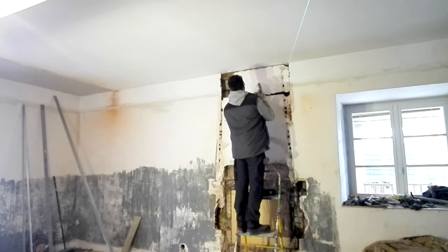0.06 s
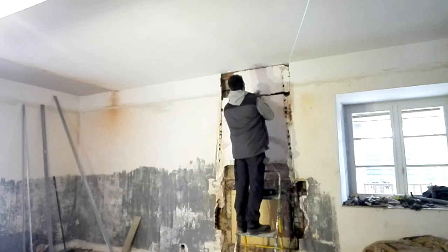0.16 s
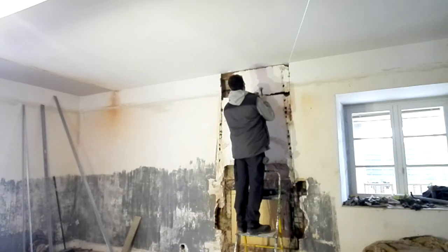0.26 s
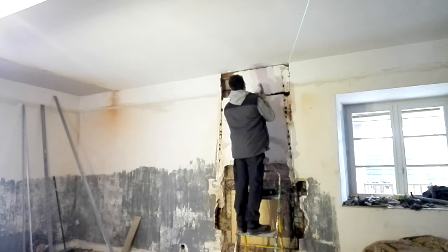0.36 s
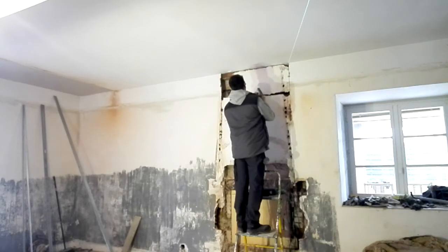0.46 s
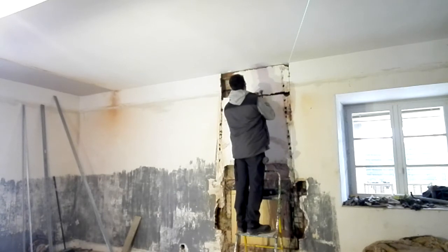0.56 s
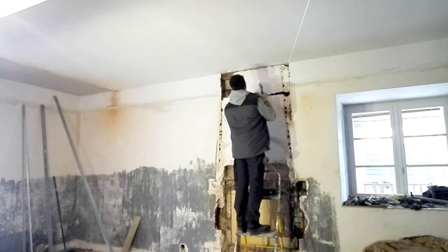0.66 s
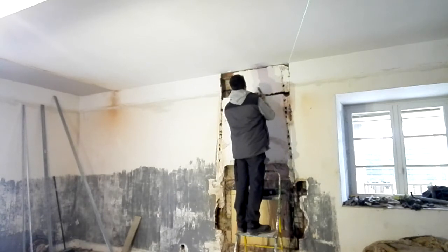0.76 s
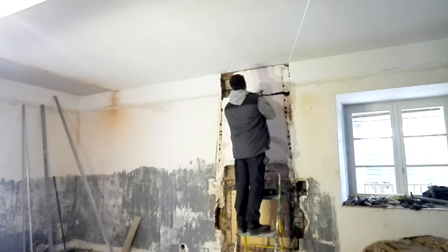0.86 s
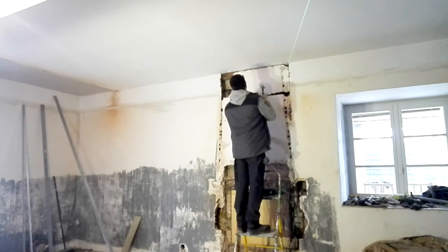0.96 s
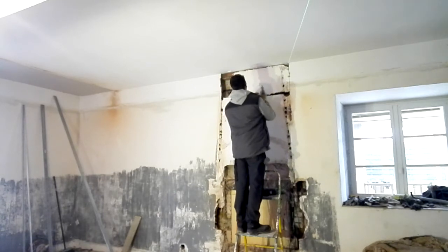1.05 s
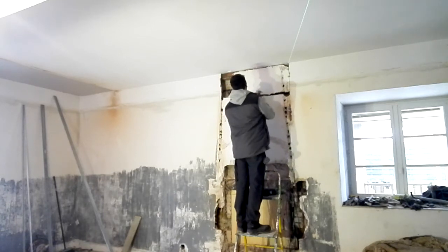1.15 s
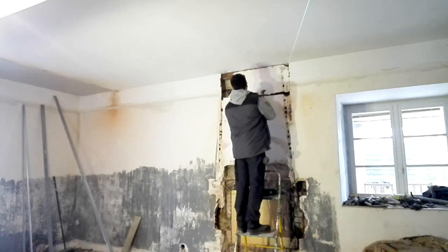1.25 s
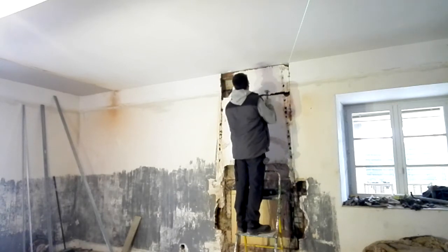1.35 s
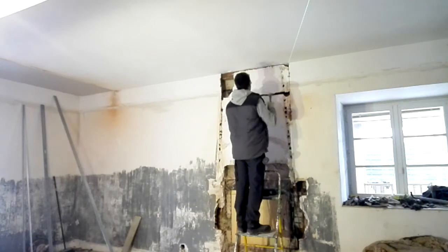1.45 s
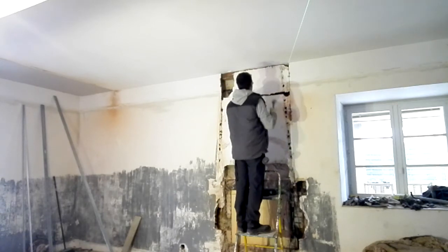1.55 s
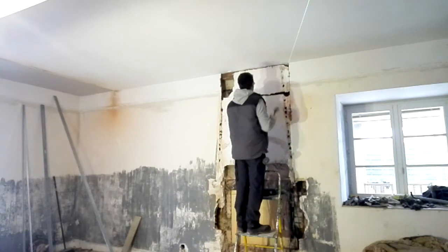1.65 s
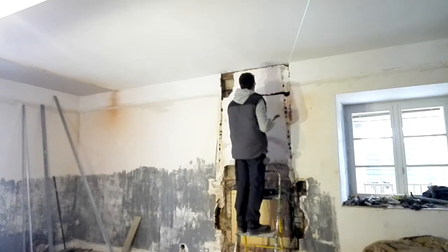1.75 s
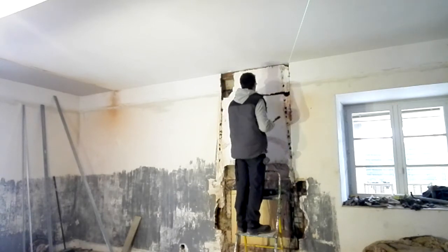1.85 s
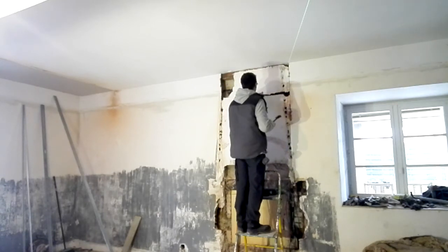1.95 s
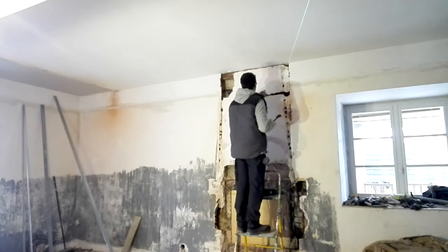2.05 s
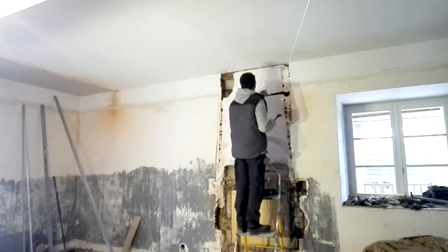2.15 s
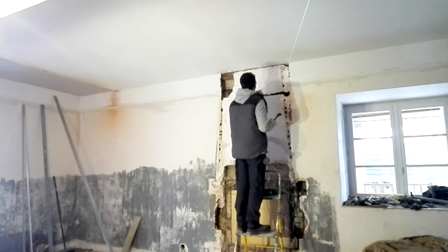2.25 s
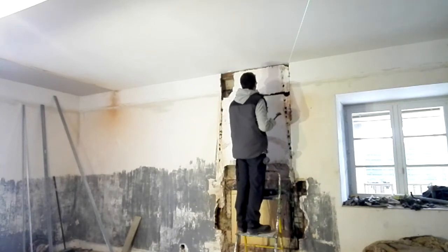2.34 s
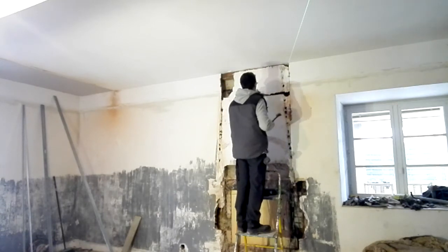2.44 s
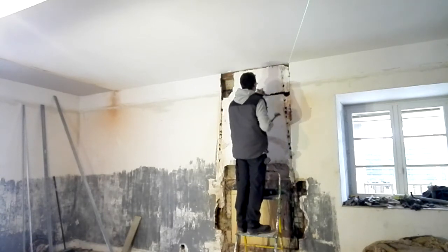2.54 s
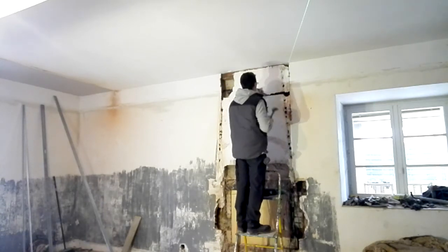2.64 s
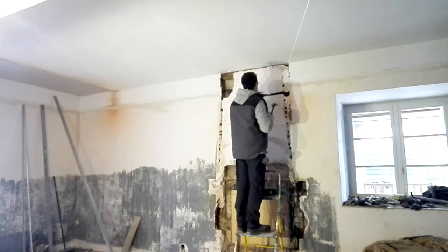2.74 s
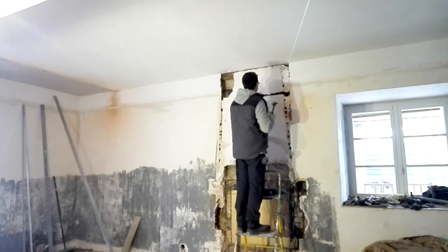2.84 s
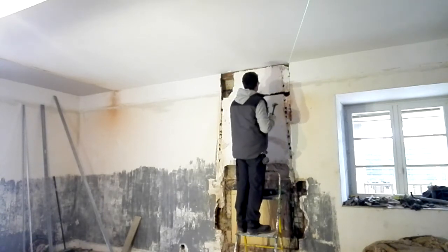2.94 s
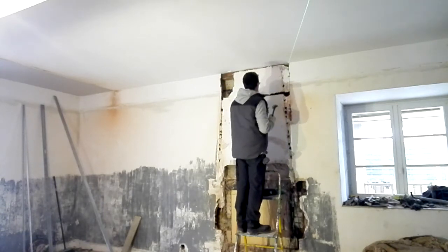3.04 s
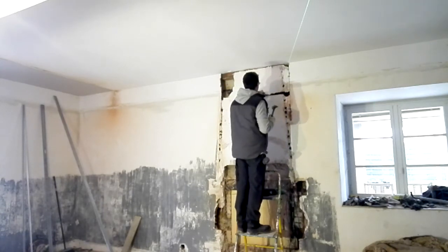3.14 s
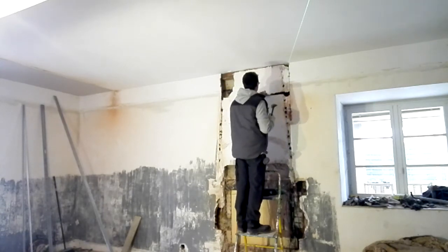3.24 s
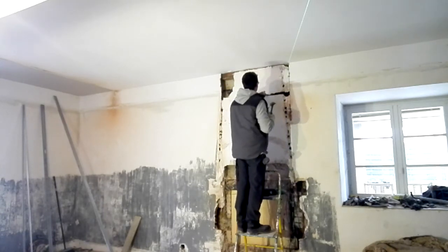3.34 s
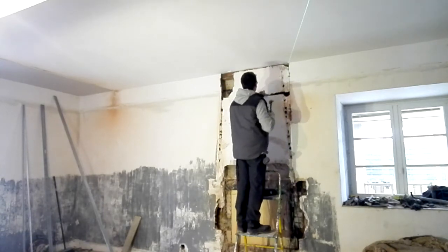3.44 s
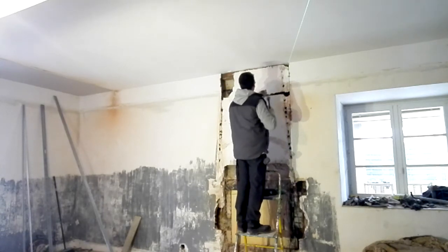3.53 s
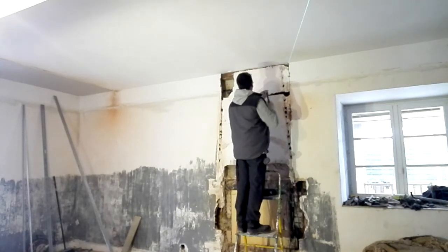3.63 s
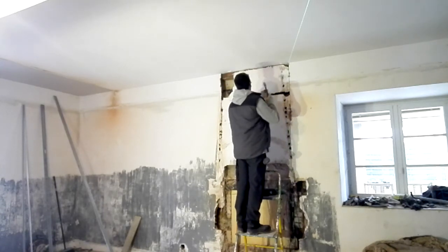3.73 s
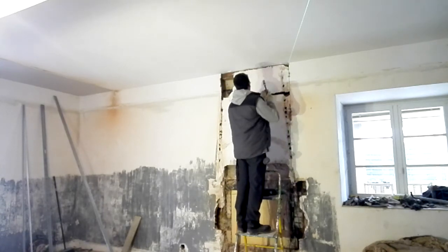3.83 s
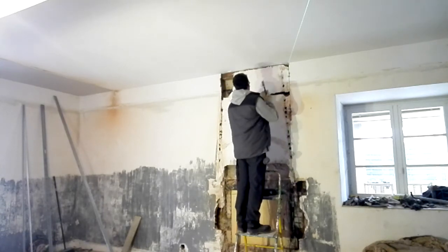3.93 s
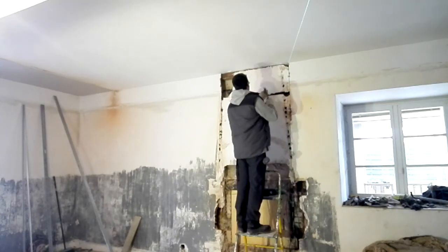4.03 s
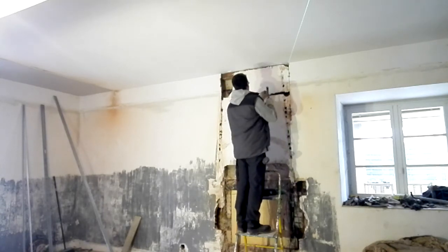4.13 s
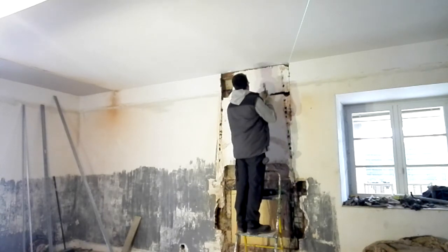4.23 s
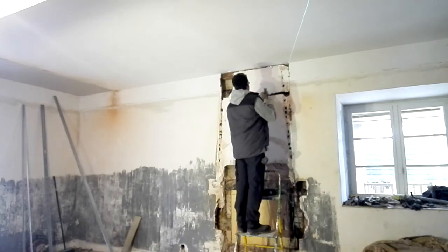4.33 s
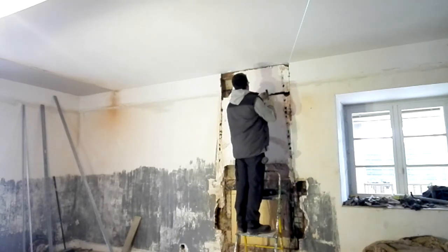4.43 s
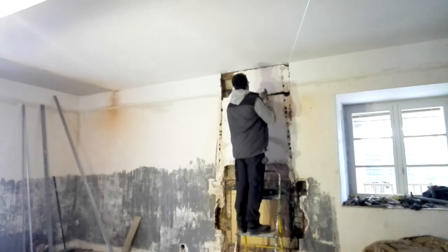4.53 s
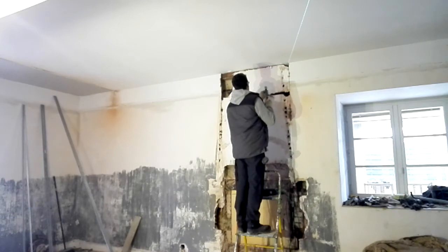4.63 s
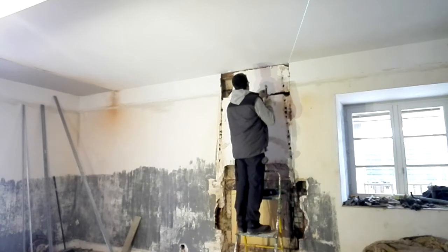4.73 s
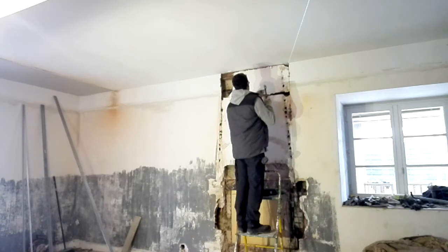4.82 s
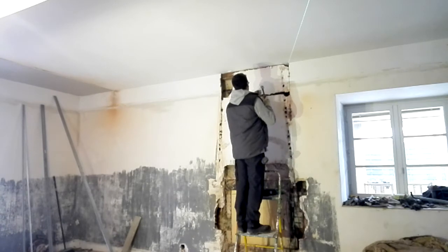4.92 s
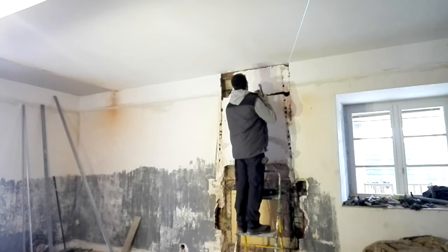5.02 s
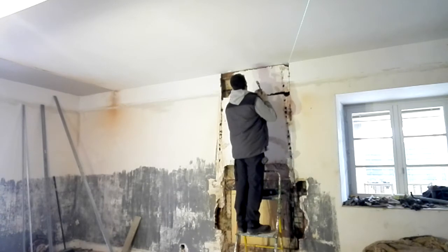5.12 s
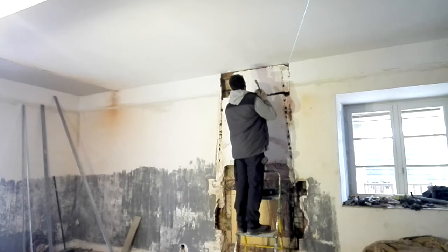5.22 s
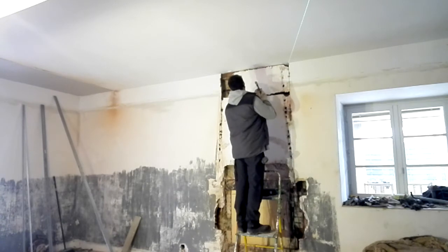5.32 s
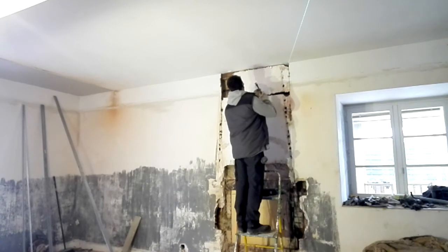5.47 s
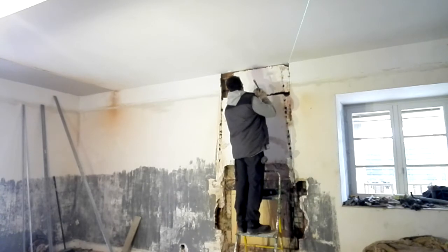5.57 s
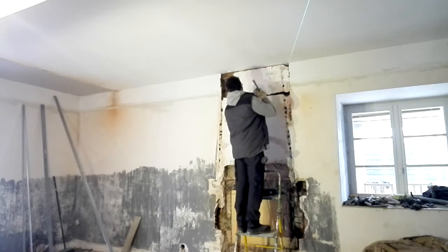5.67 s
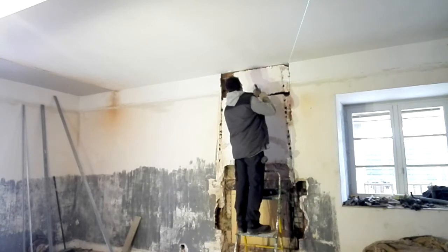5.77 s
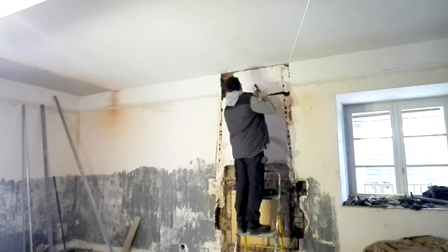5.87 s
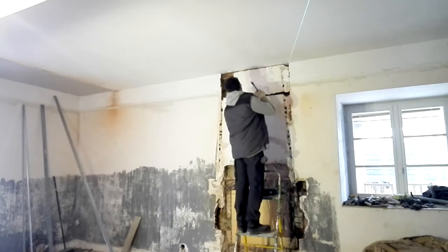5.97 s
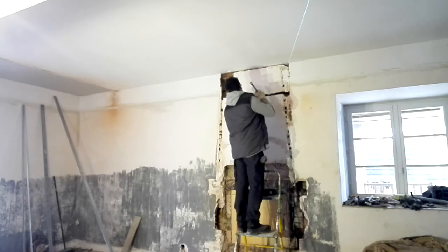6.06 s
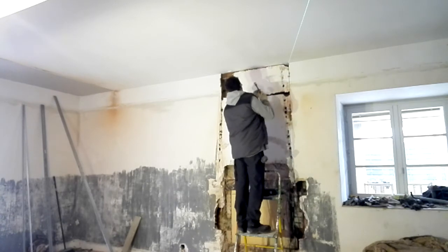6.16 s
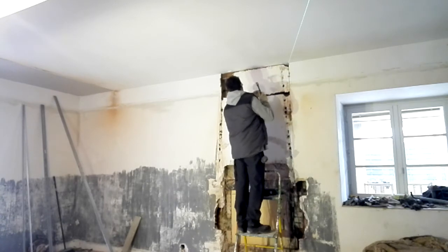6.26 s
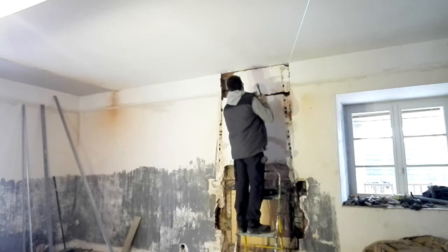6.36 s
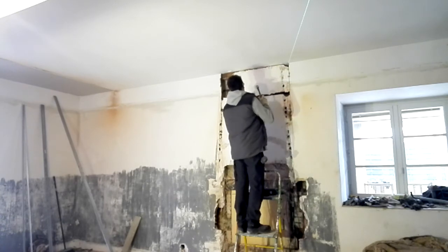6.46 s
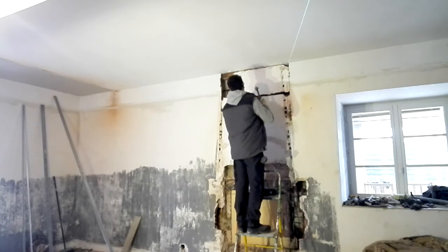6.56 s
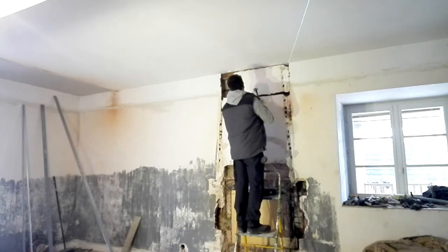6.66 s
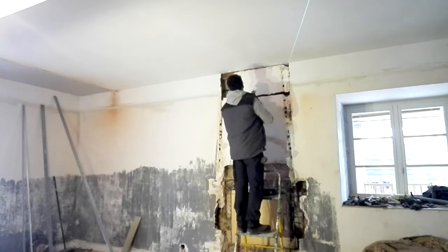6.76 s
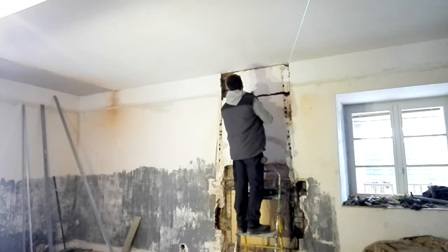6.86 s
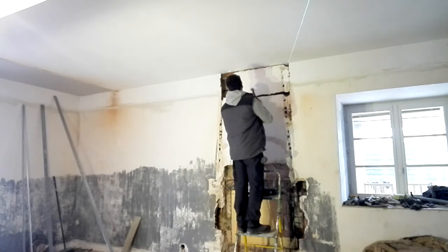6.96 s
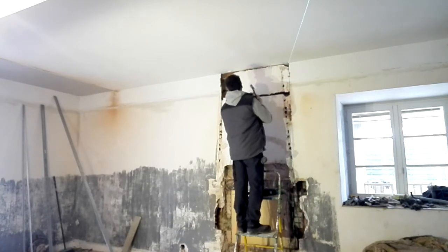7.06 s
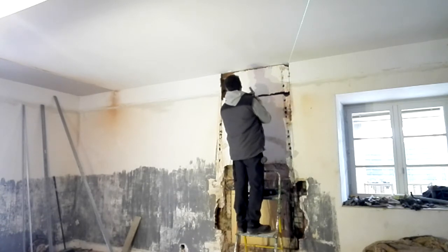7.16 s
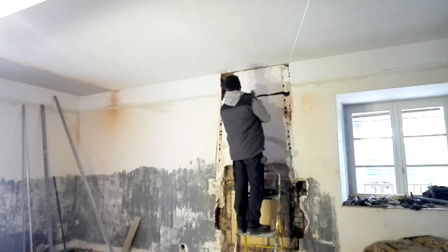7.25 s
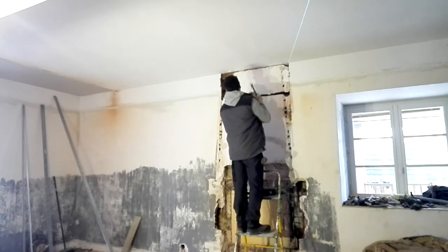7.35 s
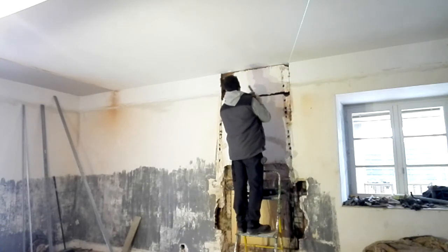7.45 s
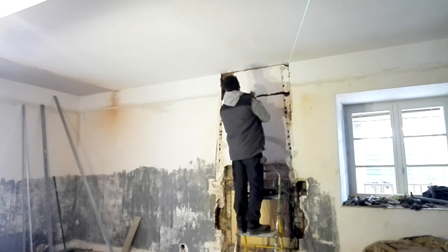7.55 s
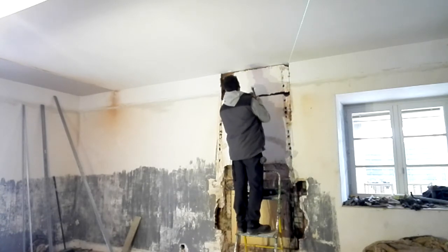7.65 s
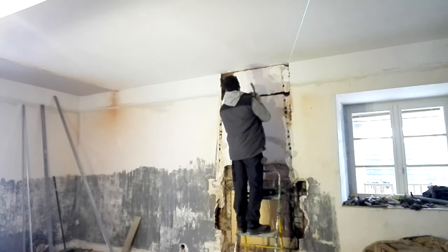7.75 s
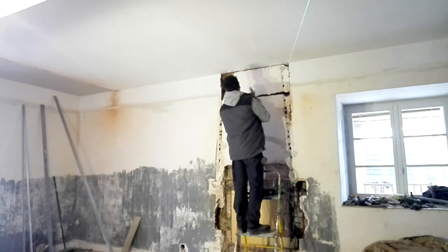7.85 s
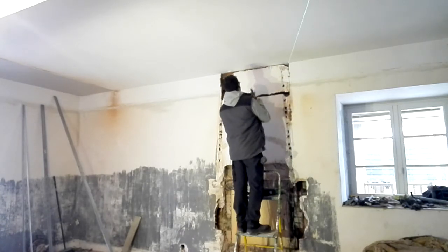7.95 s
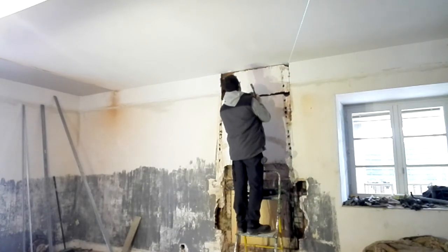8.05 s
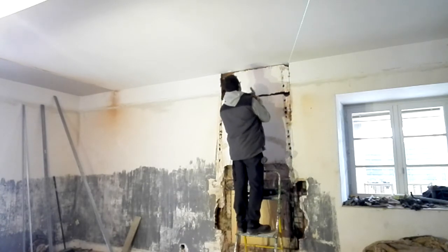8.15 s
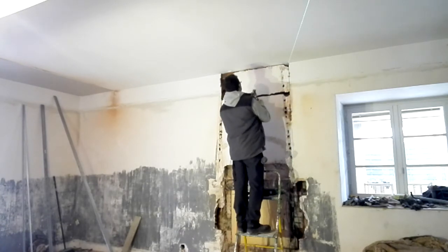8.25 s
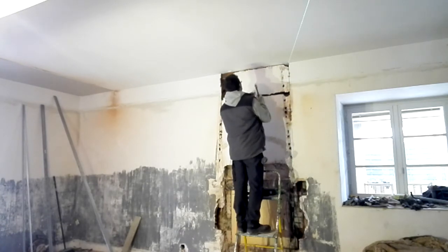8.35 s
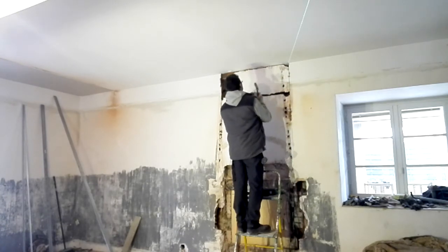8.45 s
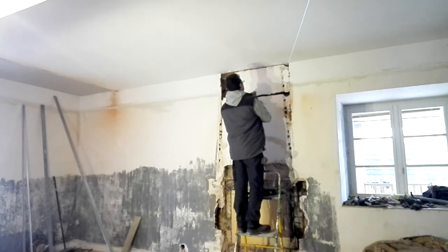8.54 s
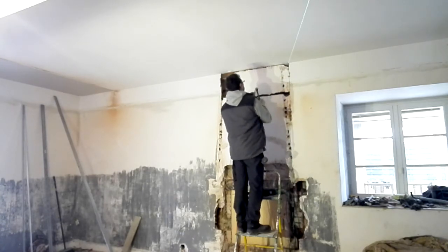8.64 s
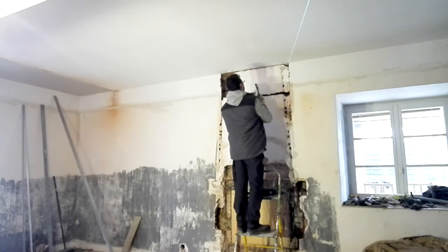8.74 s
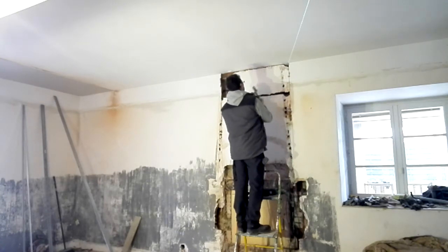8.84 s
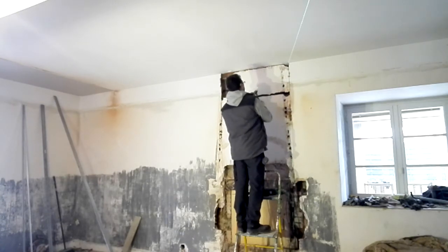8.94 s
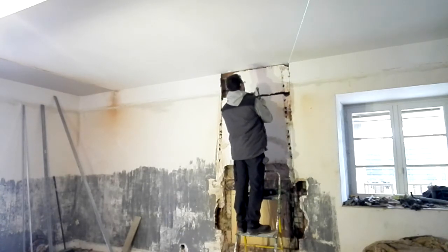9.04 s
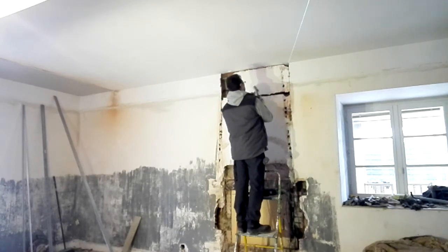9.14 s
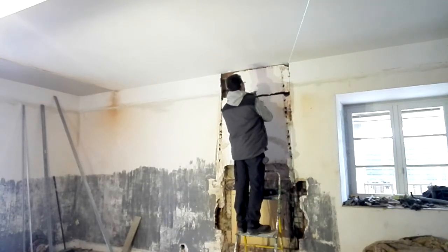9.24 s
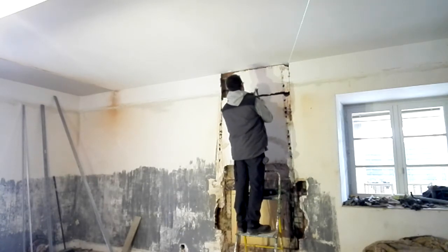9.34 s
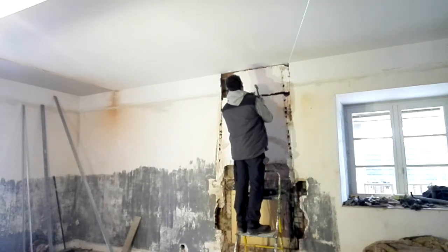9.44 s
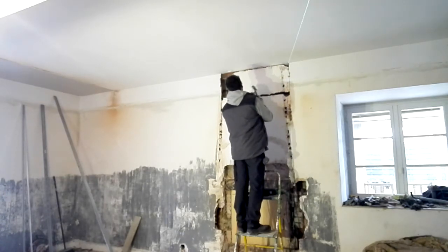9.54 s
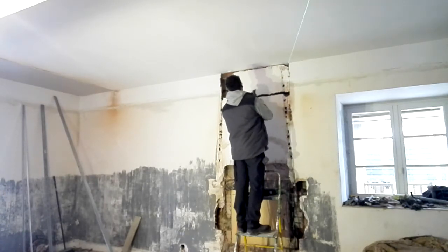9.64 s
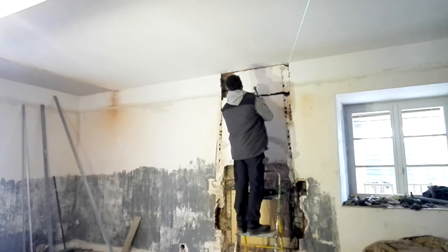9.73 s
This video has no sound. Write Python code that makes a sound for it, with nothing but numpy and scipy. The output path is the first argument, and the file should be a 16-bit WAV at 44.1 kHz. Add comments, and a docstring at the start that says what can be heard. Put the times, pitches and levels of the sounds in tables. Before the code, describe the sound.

Sharp hammer blows on a chisel thud and crack through masonry in an empty reverberant room, with quiet pauses of light steel clinks and gritty shuffling.

```python
"""A hammer drives a steel chisel into wall cladding in a bare, echoing room: each blow thuds through the
wall, cracks the mortar and rings the steel, as filtered noise bursts and damped resonances.
Between the runs the chisel grazes the wall (faint steel rings, each with one mode favoured), chips
land (clicks and crumbs) and feet and tool scuff over grit (random slips). Faint steady air noise
lies beneath."""
import sys
import numpy as np
from scipy import signal
from scipy.fft import rfft, irfft
from scipy.io import wavfile

SR = 44100
rng = np.random.default_rng(int(sys.argv[2]) if len(sys.argv) > 2 else 0)


def store_pcm(level_fs):
    """Save levels as 16-bit WAV."""
    pcm = np.round(np.clip(level_fs, -1, 1) * 32767).astype(np.int16)
    wavfile.write(sys.argv[1], SR, np.atleast_2d(pcm).T)


N = 431738
SIZE = 49152  # samples in one sound
T, F = np.arange(SIZE) / SR, np.arange(SIZE // 2 + 1) * SR / SIZE  # [s], [Hz]

# hammer blows: (time [s], force [dB], bite [0 loose tip - 1 wedged], off-centre [0-1],
# contact hardness [dB], thud of that spot [dB])
BLOWS = [(0.1895, 0.5, 1, 0.11, -4.5, -4.5), (0.5086, 1, 0.97, 0.14, -15, -4.5),
         (0.8284, -0.5, 1, 0.15, -24, -4.5), (1.1537, -1, 1, 0.05, -22, -2), (4.0521, 0, 0.5, 1, -3, -5.5),
         (4.3546, 0, 0, 0.23, -2, -3.5), (5.7888, -2, 0.51, 1, -7, -2.5),
         (7.2372, -2.5, 0.41, 0.4, 0.5, 7.5), (7.5497, 0.5, 0.8, 1, 9.5, 1.5),
         (7.881, 1.5, 0.88, 0, -3, -2.5), (8.2121, 0, 0.83, 0, -4, -1), (8.5595, 2, 0.68, 0.3, -0.5, -0.5),
         (8.904, -2, 0.89, 0.4, 2.5, -1), (9.24, 2.5, 0.49, 0.48, -0.5, -2), (9.6151, 2, 0.59, 0, -4.5, -7)]
STROKE_S = 0.33  # time from the stroke before the start to the first listed blow
# wall entry of a 0 dB blow: (level with a loose tip [dB], level with a wedged tip [dB])
BOOM_LEVELS_DB = (-40, -32)
THUD_LEVELS_DB = (-40, -22)
KNOCK_LEVELS_DB = (-43.5, -22)
CRACK_LEVELS_DB = (-27, -21)
BLOOM_LEVELS_DB = (-47, -22.5)
# deep boom of the building: (frequency [Hz], relative density [dB per Hz])
BOOM_COLOUR = [(20, -16.5), (36, -6), (45, -12), (54, 2.5), (66, -22), (82, -0.5), (120, -5), (170, -22)]
# thud of the wall: (frequency [Hz], relative density [dB per Hz])
THUD_COLOUR = [(80, -20), (135, 4.5), (180, 4.5), (230, 3), (290, 0), (345, -1.5), (410, -10), (900, -32.5)]
# knock of the cladding: (frequency [Hz], relative density [dB per Hz])
KNOCK_COLOUR = [(200, -28), (410, -10), (500, 1.5), (620, 0), (950, 3), (1300, 3), (1600, 1), (2100, -1.5),
                (3200, -15), (7000, -18.5)]
# crack of the mortar: (frequency [Hz], relative density [dB per Hz])
CRACK_COLOUR = [(300, -24), (1400, 1), (2500, 0.5), (5200, -1.5), (6300, 2.5), (7400, -5), (8400, -10.5),
                (11000, -9), (12500, -14), (14200, -19.5)]
# wall and room resonances that bloom after a blow: (frequency [Hz], relative level [dB], t60 [s])
WALL_MODES = [(33, -26, 2.4), (54, -21.5, .7), (160, -11, .4), (181, -7, .45), (214, -8, .5),
              (271, -6.5, .45), (323, -10.5, .45), (473, -19, .6), (508, -19, .55), (686, -18, .6),
              (807, -18, .55), (876, -17, .6), (1014, -15, .55), (1421, -20, .55)]
# share of the contact hardness by frequency: (frequency [Hz], share [0-1])
HARDNESS_SHARE = [(7500, 0), (11000, 1)]
# note of the cladding, until it cracks
TILE_HZ, TILE_DB, TILE_T60_S, TILE_CRACKS_S = 2126, -32, .1, .7

# chisel and hammer head: (nominal frequency [Hz], relative level [dB], t60 [s])
STEEL_MODES = [(2210, -4, .09), (3316, -15, .03), (4135, -11, .06), (4620, -15, .05), (5918, -2.5, .22),
               (5985, -5, .03), (6648, -5, .08), (6790, -4, .018), (7130, -4, .018), (7310, -2, .04),
               (7420, -8, .02), (8060, -18, .05), (9260, -20, .06), (10020, -8, .035), (11380, -8, .012),
               (11515, -6.5, .1), (11640, -3, .025), (13160, 1, .04)]
STEEL_RISE_S = .0025
# ring with a loose tip: (frequency [Hz], gain [dB])
RING_LOOSE_GAIN = [(2200, -28.5), (3300, -30.5), (4140, -20), (4620, -22.5), (5950, -24), (6700, -33.5),
                   (7400, -32.5), (10020, -16), (11550, -19), (13160, -26)]
# ring with a wedged tip: (frequency [Hz], gain [dB])
RING_WEDGED_GAIN = [(2200, -54), (4140, -48.5), (5950, -39.5), (6700, -39), (7400, -41.5), (10020, -33),
                    (11550, -29.5), (13160, -60)]
# bending modes favoured by a fully off-centre blow: (frequency [Hz], gain [dB])
AIM_GAIN = [(5990, 7.5), (6600, -18), (10020, -22), (11380, -18), (11515, -5), (11640, -16), (13160, -16)]
# bounce of the chisel on its seat; its pitch rises with bite squared
SEAT_HZ, SEAT_RISE_HZ, SEAT_WIDTH_HZ, SEAT_DB = 6650, 725, 360, 17.5

# grazes of the loose chisel: (time [s], level offset [dB], favoured mode [Hz])
CLINK_EVENTS = [(1.877, -53.5, 4620), (1.992, -52.5, 4620), (2.1, -62, 10020), (2.579, -73, 4135),
                (3.029, -62.5, 4135), (3.111, -51.5, 4135), (3.65, -64, 4135), (4.93, -60.5, 10020)]
# reach of a sideways graze into the steel: (frequency [Hz], gain [dB])
GRAZE_GAIN = [(2200, -11), (3300, -5), (4140, 11), (4620, 10.5), (5940, -2), (6650, 1.5), (7300, -9),
              (8060, 13), (9260, 10), (10020, -1.5), (11500, -12), (13160, -26)]
FAVOURED_DB, FAVOURED_WIDTH_HZ = 8.5, 200
# landing chips: (time [s], click level [dB], note [Hz], note level [dB])
CHIP_EVENTS = [(1.625, -55.5, 6300, -65.5), (3.152, -29, 2683, -51.5), (5.276, -47, 5100, -48),
               (6.291, -41, 3020, -46), (6.441, -28, 3380, -49.5)]
# click of a chip whose note is CHIP_HZ: (frequency [Hz], relative density [dB per Hz])
CHIP_COLOUR = [(200, -22), (500, -14), (1200, -1), (3200, 3), (6500, -10.5), (10000, -24.5), (14000, -31)]
CHIP_HZ, CHIP_NOTE_T60_S = 3070, .003
# shifting feet and tool scuffs: (time [s], bump level [dB], grit level [dB], length [s])
SCUFF_EVENTS = [(1.856, -50, -58.5, 0.02), (1.895, -38.5, -47.5, 0.025), (2.437, -62, -63.5, 0.08),
                (2.563, -52.5, -56.5, 0.028), (3.016, -54, -55.5, 0.052), (3.061, -43.5, -49.5, 0.049),
                (3.392, -44, -54.5, 0.027), (3.634, -50, -57.5, 0.076), (3.833, -64.5, -63.5, 0.032),
                (3.873, -53.5, -66.5, 0.062), (4.874, -57, -53.5, 0.014), (4.925, -54.5, -65.5, 0.025),
                (5.115, -77, -57.5, 0.06), (5.159, -44, -59, 0.029), (6.589, -56, -56, 0.028),
                (6.815, -60.5, -80.5, 0.025)]
# bump on the footing: (frequency [Hz], relative density [dB per Hz])
BUMP_COLOUR = [(25, 0.5), (80, 3), (150, 2), (220, 3), (300, -7.5), (430, -11.5), (600, -17), (900, -28),
               (2000, -34.5)]
# slipping grit: (frequency [Hz], relative density [dB per Hz])
GRIT_COLOUR = [(300, -10), (600, 2.5), (900, 7.5), (1400, 6), (4500, -1.5), (7500, -10), (10000, -18),
               (14000, -29)]
# air noise: (frequency [Hz], relative density [dB per Hz])
AIR_COLOUR = [(15, -38), (25, -1), (80, -12), (113, -6), (539, -32), (1400, -23.5), (2640, -32.5),
              (6330, -29), (9660, -33), (14000, -33.5)]
AIR_DB = -74.5
# strong early reflections from wall and ceiling: (delay [s], gain [linear])
EARLY_REFLECTIONS = [(.0002, .6), (.0012, 0.92), (.0045, .8), (.0058, .9), (0.0115, .45), (.021, 0.57)]
# reverberation: (frequency [Hz], t60 [s])
ROOM_DECAY = [(100, 0.61), (400, 0.61), (1500, 0.66), (4000, 0.6), (7000, 0.5), (10000, 0.38), (14000, 0.4)]
# treble tilt of the early reflections: (frequency [Hz], gain [linear])
EARLY_TILT = [(300, 0.17), (2000, 0.27), (7000, 1.0)]
TOP_HZ = 14150


def undb(db):
    """Decibels to gain."""
    return 10 ** (np.asarray(db) / 20)


def along(points, hz):
    """Read (Hz, value) points on a log-frequency axis."""
    at, value = np.transpose(points)
    return np.interp(np.log(hz + 1), np.log(at), value)


def causal(db):
    """Minimum-phase response with the given gain at each frequency."""
    cepstrum = irfft(np.log(undb(db) + 1e-5))
    cepstrum[1:SIZE // 2] *= 2
    cepstrum[SIZE // 2 + 1:] = 0
    return np.exp(rfft(cepstrum))


def colour(points):
    """Response with the given (Hz, dB) shape, falling 12 dB per octave outside its range."""
    octaves_outside = np.abs(np.log2((F + 1) / np.clip(F + 1, points[0][0], points[-1][0])))
    return causal(along(points, F) - 12 * octaves_outside)


def mode(hz, t60_s):
    """Response of one damped resonance."""
    width_hz = np.log(1000) / (np.pi * t60_s)
    return 1j * F * width_hz / (hz ** 2 - F ** 2 + 1j * F * width_hz)


def sound(spectrum, db, span_s=0.12):
    """Waveform of a spectrum at an rms level over its first span_s, faded over its second half."""
    wave = irfft(spectrum) * np.minimum(1, 2 * (1 - T / T[-1]))
    rms = np.sqrt(np.mean(wave[:int(span_s * SR)] ** 2))
    return wave * undb(db) / rms


def add(track, s, wave):
    """Mix a sound in at time s, which may lie before the start."""
    start = int(s * SR)
    wave, start = wave[max(-start, 0):], max(start, 0)
    track[start:start + len(wave)] += wave[:max(N - start, 0)]


def room_paths(count, early_db=8.0, contact_s=0.00094, build_s=0.0022, hold_s=0.0034):
    """Room responses to a gritty contact, a new one per event: early noise bursts and a diffuse tail."""
    hz, t60_s = np.transpose(ROOM_DECAY)
    # overlapping bands, one per decay time
    bands = np.array([along(np.column_stack([hz, own]), F) for own in np.eye(len(hz))])
    # echoes thicken, hold for the first crossings, then die away
    decay = undb(-60 * (np.hypot(T, hold_s) - hold_s) / t60_s[:, None])
    fades = decay * (1 - np.exp(-T / build_s))
    bursts = sum(gain * (T >= s) * np.exp(-np.abs(T - s) / contact_s) for s, gain in EARLY_REFLECTIONS)
    tilt = along(EARLY_TILT, F)
    for _ in range(count):
        tail = (irfft(bands * rfft(rng.standard_normal(SIZE))) * fades).sum(axis=0)
        early = rfft(bursts * rng.standard_normal(SIZE)) * tilt
        yield rfft(tail) + undb(early_db) * early


def spot(patchy_db, count=70):
    """Broad, uneven resonances of one spot: random gains over frequency."""
    hz = np.linspace(np.sqrt(300), np.sqrt(15000), count) ** 2
    return causal(patchy_db * np.interp(F, hz, rng.standard_normal(count)))


def hammering(crack_hardness=0.18):
    """Each blow excites wall, cladding, mortar and steel; a wedged tip thuds, a loose one rings."""
    track = np.zeros(N)
    boom, thud = colour(BOOM_COLOUR), colour(THUD_COLOUR)
    knock, crack = colour(KNOCK_COLOUR), colour(CRACK_COLOUR)
    bloom = np.zeros(SIZE)
    for k, (hz, db, t60_s) in enumerate(WALL_MODES):
        # the shorter second resonance slows the onset; polarities alternate
        bloom += (-1) ** k * sound(mode(hz, t60_s) * mode(hz, t60_s / 8), db)
    loose_db, wedged_db = np.transpose(
        [BOOM_LEVELS_DB, THUD_LEVELS_DB, KNOCK_LEVELS_DB, CRACK_LEVELS_DB, BLOOM_LEVELS_DB])
    # the run is already under way: the room still rings from one stroke earlier
    blows = [(BLOWS[0][0] - STROKE_S, *BLOWS[0][1:]), *BLOWS]
    for blow, room, tool_room in zip(blows, room_paths(len(blows)), room_paths(len(blows))):
        s, force_db, bite, off_centre, hard_db, spot_db = blow
        boom_db, thud_db, knock_db, crack_db, bloom_db = loose_db + bite * (wedged_db - loose_db)
        masonry = sound(room * boom, boom_db) + sound(room * thud, thud_db + spot_db)
        masonry = masonry + bloom * undb(bloom_db + spot_db)
        hardness = undb(crack_hardness * hard_db * along(HARDNESS_SHARE, F))
        struck = room * spot(patchy_db=3.0) * hardness
        cladding = sound(struck * knock, knock_db) + sound(struck * crack, crack_db)
        if s < TILE_CRACKS_S:
            cladding = cladding + sound(room * mode(TILE_HZ, TILE_T60_S), TILE_DB)
        tool = steel(tool_room, ring_levels(bite, off_centre, hard_db))
        add(track, s, undb(force_db) * (masonry + cladding + tool))
    return track


def ring_levels(bite, off_centre, hard_db):
    """Gain in dB of each steel mode: the wall damps them, seat, aim and hardness pick among them."""
    hz = np.array(STEEL_MODES)[:, 0]
    damped_db = (1 - bite) * along(RING_LOOSE_GAIN, hz) + bite * along(RING_WEDGED_GAIN, hz)
    seat_hz = SEAT_HZ + SEAT_RISE_HZ * bite ** 2
    seat_db = SEAT_DB * np.exp(-((hz - seat_hz) / SEAT_WIDTH_HZ) ** 2)
    aim_db = off_centre * along(AIM_GAIN, hz)
    return damped_db + seat_db + aim_db + hard_db * along(HARDNESS_SHARE, hz)


def steel(room, strengths_db):
    """Steel modes swell briefly and ring into the room; the grip detunes them a little each time."""
    detunes = 1 + .0012 * rng.standard_normal(len(STEEL_MODES))
    gains = undb(np.array(STEEL_MODES)[:, 1] + strengths_db)
    spectrum = np.zeros(len(F), complex)
    for (hz, _, t60_s), detune, gain in zip(STEEL_MODES, detunes, gains):
        ring = room * mode(hz * detune, t60_s) * mode(hz, STEEL_RISE_S)
        energy = np.vdot(ring, ring).real
        spectrum += ring * (gain / np.sqrt(energy))
    return sound(spectrum, 20 * np.log10(np.linalg.norm(gains)))


def clinks():
    """Faint rings of the chisel moved to a new place; each graze favours one mode."""
    track, hz = np.zeros(N), np.array(STEEL_MODES)[:, 0]
    for (s, db, note_hz), room in zip(CLINK_EVENTS, room_paths(len(CLINK_EVENTS))):
        others_db = -FAVOURED_DB * (1 - np.exp(-((hz - note_hz) / FAVOURED_WIDTH_HZ) ** 2))
        add(track, s, steel(room, db + along(GRAZE_GAIN, hz) + others_db))
    return track


def chips(bounce=0.13, settle_s=0.027, bounces_per_s=90):
    """A chip lands with a click and a very short note, then crumbs bounce as sparse decaying impulses."""
    track = np.zeros(N)
    for (s, db, note_hz, note_db), room in zip(CHIP_EVENTS, room_paths(len(CHIP_EVENTS))):
        hits = (rng.random(SIZE) < bounces_per_s / SR) * rng.standard_normal(SIZE)
        force = bounce * hits * np.exp(-T / settle_s)
        force[0] = 1
        landing = room * rfft(force) * spot(patchy_db=0.3)
        # the colour shifts with the note
        shape = np.array(CHIP_COLOUR) * [note_hz / CHIP_HZ, 1]
        click = sound(landing * colour(shape), db)
        note = sound(landing * mode(note_hz, CHIP_NOTE_T60_S) ** 2, note_db)
        add(track, s, click + note)
    return track


def scuffs(slips_per_s=260, swell_s=0.00504, first_catch=0.32):
    """Soles and steel slip over grit in short bursts of uneven catches, and the footing bumps."""
    track, bump, grit = np.zeros(N), colour(BUMP_COLOUR), colour(GRIT_COLOUR)
    for (s, bump_db, grit_db, length_s), room in zip(SCUFF_EVENTS, room_paths(len(SCUFF_EVENTS))):
        catches = (rng.random(SIZE) < slips_per_s / SR) * rng.standard_normal(SIZE)
        force = catches * np.exp(-(T / length_s) ** 2) * (1 - np.exp(-T / swell_s))
        force[0] = first_catch
        slip = room * rfft(force) * spot(patchy_db=-2.5)
        add(track, s, sound(slip * bump, bump_db) + sound(slip * grit, grit_db))
    return track


def quiet_room():
    """Faint steady air noise: coloured Gaussian noise."""
    hz = np.arange(N // 2 + 1) * SR / N
    air = irfft(rfft(rng.standard_normal(N)) * undb(along(AIR_COLOUR, hz)), N)
    return air * undb(AIR_DB) / air.std()


def scene(side_db=-14, side_hz=5000, diffuse_s=.012):
    """All sources sit in the centre; the treble is slightly diffuse, opposite in the two channels."""
    mid = hammering() + clinks() + chips() + scuffs() + quiet_room()
    diffuser = rng.standard_normal(SIZE) * np.exp(-T / diffuse_s)
    side = signal.fftconvolve(mid, diffuser / np.linalg.norm(diffuser))[:N]
    highpass = signal.butter(6, side_hz, "high", fs=SR, output="sos")
    side = undb(side_db) * signal.sosfilt(highpass, side)
    return np.array([mid + side, mid - side])


def record(dry):
    """Flatten peaks above full scale, with one gain for both channels, then cut the top steeply."""
    held = dry / np.maximum(np.abs(dry).max(axis=0), 1)
    lowpass = signal.ellip(12, .2, 80, TOP_HZ, fs=SR, output="sos")
    return signal.sosfilt(lowpass, held)


dry = scene()
out = record(dry)
store_pcm(out)
```